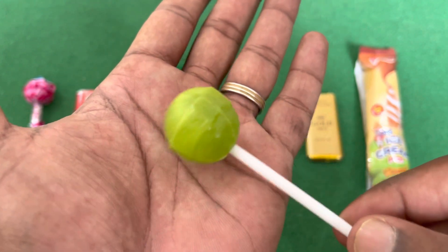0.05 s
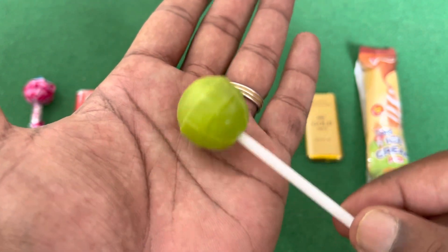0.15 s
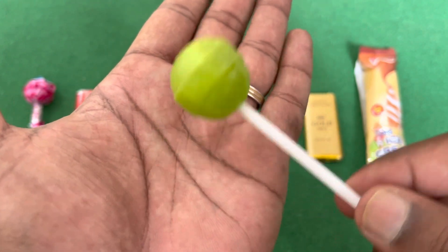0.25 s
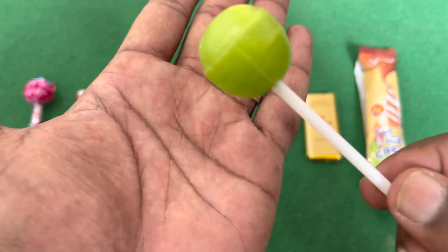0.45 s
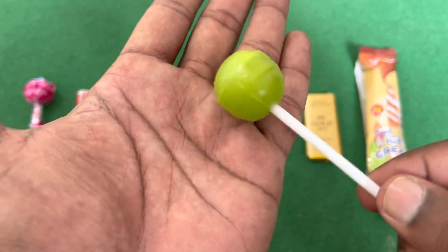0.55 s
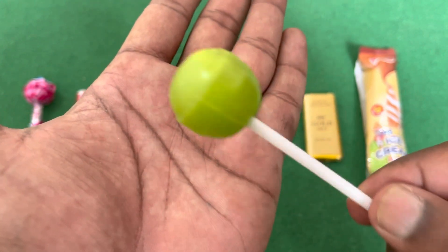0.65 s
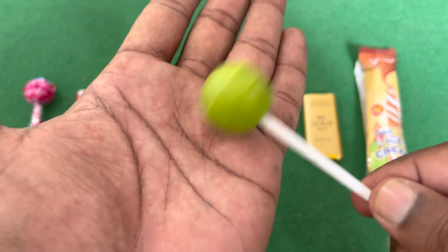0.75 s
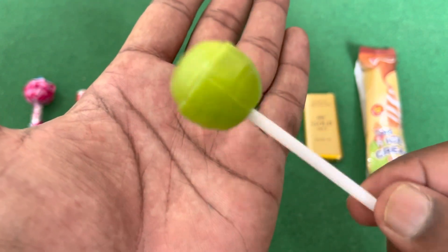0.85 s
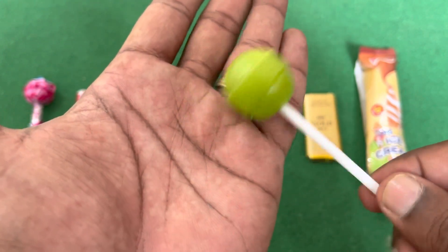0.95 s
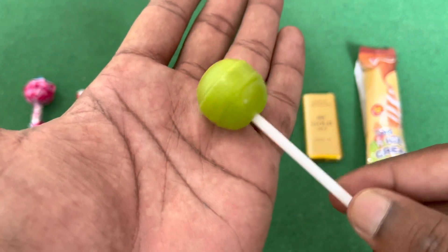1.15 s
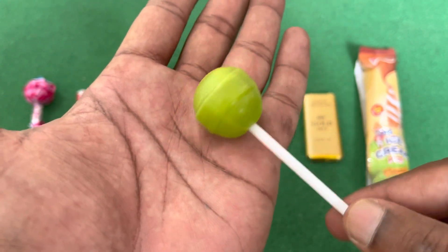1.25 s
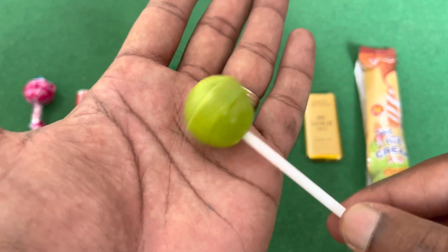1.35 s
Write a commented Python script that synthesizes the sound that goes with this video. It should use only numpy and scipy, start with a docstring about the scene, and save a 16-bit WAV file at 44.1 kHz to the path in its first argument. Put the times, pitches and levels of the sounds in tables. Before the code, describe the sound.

A hard lollipop taps a metal finger ring three times, making sharp, glassy clicks, the third loudest, followed by a faint tick. The microphone is close, in a small quiet room with a low appliance hum.

```python
"""Hard, close clicks in a small quiet room: a lollipop tapped on a metal finger ring in an open palm.
Each tap is one click with brief glassy ringing, mirrored by the table and scattered by the hand,
then a faint room tail. The candy also bumps and brushes the skin.
An appliance hums behind, over low room air."""
import sys
import numpy as np
from scipy import signal
from scipy.fft import rfft, irfft, next_fast_len
from scipy.io import wavfile
from scipy.ndimage import uniform_filter1d

SR = 44100
rng = np.random.default_rng(int(sys.argv[2]) if len(sys.argv) > 2 else 0)


def transcribe(u):
    """Save the signal u as a 16-bit wav file named by the first command-line argument.

    u: samples, shape (n,) or (channels, n), limited to [-1, 1]; the rate is SR.
    q: integer samples, one column per channel.
    """
    v = np.clip(np.atleast_2d(u).T, -1, 1)
    q = np.round(v * 32767).astype(np.int16)
    wavfile.write(sys.argv[1], SR, q)


N = 61739

# Room air. Each row: frequency in Hz, relative density in dB.
AIR_SPECTRUM = [(20, -21.5), (50, -2), (80, 1), (160, -5), (220, -5.5), (310, -13), (420, -11),
                (620, -19.5), (1000, -23.5), (1800, -26), (2300, -33.5), (3000, -37), (4200, -46.5),
                (9000, -57.5), (11700, -47.5), (13500, -53), (15500, -68)]
# Stereo width of the air. Each row: frequency in Hz, side to mid in dB.
AIR_WIDTH = [(60, -19), (160, -11), (260, -8.5), (400, -7), (700, 0), (1400, 0), (1900, -6), (2500, -17),
             (5000, -30)]
# Low rumble of the air. Each row: time in seconds, gain in dB.
RUMBLE_GAIN = [(0, 0.5), (0.22, 1), (0.55, -0.5), (0.9, 0), (1.15, -4), (1.4, 1.5)]
# Appliance. Each row: frequency in Hz, mid-scene level in dB, drift in dB per second.
HUM_TONES = [(158.9, -61.5, -12), (256.8, -52.5, -2), (791, -75, -8.5)]
# Bumps on the palm. Each row: start in seconds, level in dB, frequency in Hz.
PALM_BUMPS = [(0.214, -45.5, 70), (0.532, -46, 80), (0.717, -40.5, 79)]
# Brushes on skin. Each row: centre in seconds, half length in seconds, level in dB.
SKIN_BRUSHES = [(0.116, 0.011, -83), (0.739, 0.059, -71), (1.195, 0.097, -73.5), (1.372, 0.0624, -71)]
# Brushing hiss. Each row: frequency in Hz, relative level in dB.
BRUSH_SPECTRUM = [(500, -12), (2000, 5), (4000, -1.5), (8000, -12), (12000, -8), (15000, -24)]
# Room tail. Each row: frequency in Hz, gain in dB.
ROOM_SPECTRUM = [(500, 2), (2000, -1.5), (4500, 0.5), (7000, -5), (9500, -1.5), (14000, -2.5)]
# Candy and finger ring. Each row: frequency in Hz, level in dB, T60 in seconds.
RING_MODES = [(12200, -7.5, 0.0027), (12220, -6.5, 0.014), (12820, -12.5, .012)]
# Click body. Each row: frequency in Hz, level in dB.
CLICK_SPECTRUM = [(150, -28), (380, -17), (550, -11.5), (900, -12), (1200, -7), (1420, -7), (1650, 0.5),
                  (2300, -1.5), (3100, 0), (4800, -8), (6000, 2), (7300, 6.5), (8800, -0.5), (10700, -11.5),
                  (12400, -3.5), (14000, -11.5), (16000, -29.5)]
# Taps. Each row: start in seconds, level in dB, tilt in dB per octave, ringing gain in dB,
# table echo lag in ms, table echo gain in dB, room gain in dB.
CANDY_TAPS = [(0.0900, -54.5, 12, -18, 1.4, -18, -18), (0.3346, 0, 0.84, -27, 1.68, -9.5, -18.5),
              (0.5368, 1, -1.9, -26.5, 1.68, -7, -19), (0.7179, -27, -2, -23.5, 1.3, -34.5, -14.5),
              (0.9086, 5, 1.18, -24.5, 1.8, -8, -14.5), (1.0640, -20, -5, -38, 1.7, -24, -8),
              (1.0976, -31.5, -6.5, -38, 2.2, -18, -17)]
# Microphone phase. Each row: frequency in Hz, left lead in radians.
# The step near 1650 Hz lends every click a short ring.
MIC_PHASE = [(20, 0), (1350, 0), (1500, 2.5), (1635, 2.7), (1665, 6.3), (2150, 6.3), (3000, 6.95),
             (4800, 6.45), (5600, 5.27), (6600, 5.1), (8400, 3.14), (12000, 0), (15000, -2.9)]
# Microphone balance. Each row: frequency in Hz, left minus right in dB.
MIC_BALANCE = [(100, 1), (250, -0.9), (700, 1.5), (1300, -0.5), (1650, -8.5), (1900, -3.5), (2500, 0.5),
               (4000, 1.5), (8000, 0)]


def undb(db):
    return 10 ** (np.asarray(db) / 20)


def curve(points, hz):
    """Read (Hz, value) points on a log-frequency axis."""
    point_hz, values = np.array(points, float).T
    return np.interp(np.log(np.maximum(hz, 1)), np.log(point_hz), values)


def shape(x, response):
    """Filter by a complex gain, given as a function of Hz."""
    size = next_fast_len(2 * N)
    return irfft(rfft(x, size) * response(np.fft.rfftfreq(size, 1 / SR)), size)[..., :N]


def colour(x, points):
    """Filter by (Hz, dB) points."""
    return shape(x, lambda hz: undb(curve(points, hz)))


def noise(points):
    """Coloured noise, rms 1."""
    x = colour(rng.standard_normal(N), points)
    return x / np.sqrt(np.mean(x ** 2))


def wander(rate_hz):
    """Random steps, smoothed twice."""
    hold = int(SR / rate_hz)
    steps = np.repeat(rng.standard_normal(N // hold + 1), hold)
    return uniform_filter1d(uniform_filter1d(steps, hold), hold)[:N]


def decay(t, t60_s):
    return np.exp(-np.log(1000) * t / t60_s)


def room_air(t, level_db=-50, drift_db_per_s=0.85, wander_db=0.46, rumble_hz=215):
    """Low noise, wide in the midrange; its rumble dips briefly."""
    mid, side = noise(AIR_SPECTRUM), noise(AIR_SPECTRUM)
    air = mid + colour(side, AIR_WIDTH) * np.array([[1], [-1]])
    rumble = shape(air, lambda hz: 1 / (1 + (hz / rumble_hz) ** 4))
    rumble_gain = undb(np.interp(t, *np.array(RUMBLE_GAIN).T))
    air = air - rumble + rumble * rumble_gain
    return air * undb(level_db + drift_db_per_s * (t - t.mean()) - wander_db * wander(8))


def appliance_hum(t, wander_db=0.3):
    """Three tones that waver and slowly fade."""
    out = np.zeros(N)
    for hz, db, drift_db_per_s in HUM_TONES:
        rms = undb(db + drift_db_per_s * (t - t.mean()) + wander_db * wander(9))
        out += rms * np.sqrt(2) * np.sin(2 * np.pi * (hz * t + rng.random()))
    return out


def skin_brushes(t):
    """Candy and stick brush the skin: faint swells of hiss."""
    contact = sum(undb(db) * np.exp(-((t - centre_s) / half_s) ** 2)
                  for centre_s, half_s, db in SKIN_BRUSHES)
    return contact * noise(BRUSH_SPECTRUM)


def palm_bumps(t, rise_s=0.0088):
    """Candy bumps the flesh: dull, damped low tones."""
    out = np.zeros(N)
    for start_s, db, hz in PALM_BUMPS:
        age_s = np.maximum(t - start_s, 0)
        envelope = age_s / rise_s * np.exp(1 - age_s / rise_s)
        out += undb(db) * envelope * np.sin(2 * np.pi * hz * age_s)
    return out


def reflections(envelope):
    """Dense random echoes under an envelope, unit energy."""
    echoes = rng.standard_normal(N) * envelope
    return echoes / np.sqrt(np.sum(echoes ** 2))


def room_response(t, t60_s=0.38, gap_s=0.012, build_s=0.0047, early_gain=0.29):
    """Small room: weak early echoes build into a decaying tail."""
    build = early_gain + (1 - early_gain) * np.clip((t - gap_s) / build_s, 0, 1)
    return colour(reflections(build * decay(t, t60_s)), ROOM_SPECTRUM)


def table_echo(click, lag_s, cutoff_hz=7000):
    """The table returns the click late and duller."""
    return shape(click, lambda hz: np.exp(-2j * np.pi * hz * lag_s) / np.hypot(1, hz / cutoff_hz))


def ringing(t, pitch_spread=0.004):
    """Struck modes of candy and ring; pitch varies with each contact."""
    out = np.zeros(N)
    for hz, db, t60_s in RING_MODES:
        struck_hz = hz * (1 + pitch_spread * rng.standard_normal())
        out += undb(db) * np.sin(2 * np.pi * struck_hz * t) * decay(t, t60_s)
    return out


def click_body(tilt_db_per_oct, pivot_hz=5000, shelf_hz=1500, size=1024):
    """Hard contact: the shortest causal pulse with the tilted click spectrum."""
    hz = np.fft.rfftfreq(size, 1 / SR)
    octaves = np.log2(np.maximum(hz, shelf_hz) / pivot_hz)
    spectrum_db = curve(CLICK_SPECTRUM, hz) + tilt_db_per_oct * octaves
    cepstrum = irfft(np.log(undb(spectrum_db)))
    cepstrum[1:size // 2] *= 2  # fold to minimum phase
    cepstrum[size // 2 + 1:] = 0
    return np.pad(irfft(np.exp(rfft(cepstrum))), (0, N - size))


def candy_taps(t, scatter_db=-9.5, scatter_t60_s=0.014):
    """Candy strikes the ring; each click reflects off table, hand and room."""
    out = np.zeros(N)
    for start_s, db, tilt_db_per_oct, ring_db, lag_ms, echo_db, room_db in CANDY_TAPS:
        click = click_body(tilt_db_per_oct) + undb(ring_db) * ringing(t)
        hand = undb(scatter_db) * reflections(decay(t, scatter_t60_s))
        room = undb(room_db) * room_response(t)
        echo = undb(echo_db) * table_echo(click, lag_ms / 1000)
        tap = click + echo + signal.fftconvolve(click, hand + room)[:N]
        onset = int(start_s * SR)
        out[onset:] += undb(db) * tap[:N - onset]
    return out


def scene():
    t = np.arange(N) / SR
    return candy_taps(t) + palm_bumps(t) + skin_brushes(t) + room_air(t) + appliance_hum(t)


def record(dry):
    """Stereo microphone: phase and level differ between channels; low-pass at 16.5 kHz."""
    sides = np.array([[0.5], [-0.5]])

    def response(hz):
        return undb(sides * curve(MIC_BALANCE, hz)) * np.exp(1j * sides * curve(MIC_PHASE, hz))

    lowpass = signal.ellip(8, 0.2, 70, 16500, fs=SR, output="sos")
    return signal.sosfilt(lowpass, shape(dry, response))


dry = scene()
out = record(dry)
transcribe(out)
```